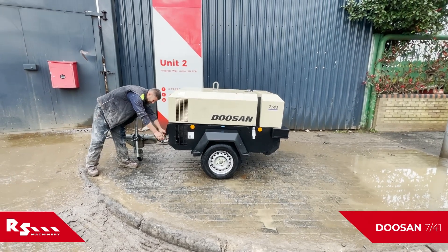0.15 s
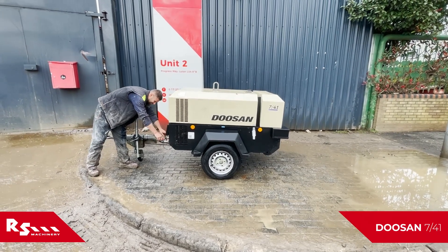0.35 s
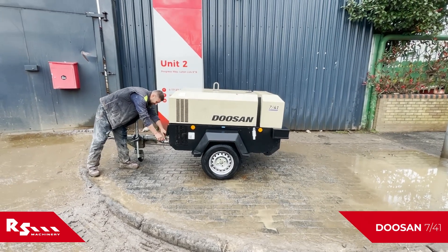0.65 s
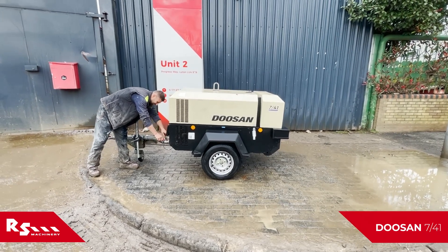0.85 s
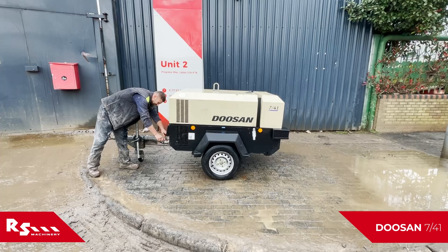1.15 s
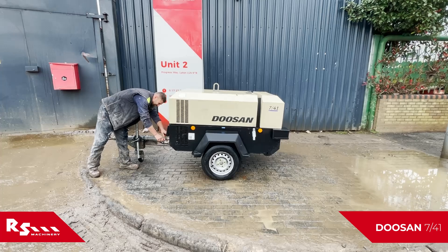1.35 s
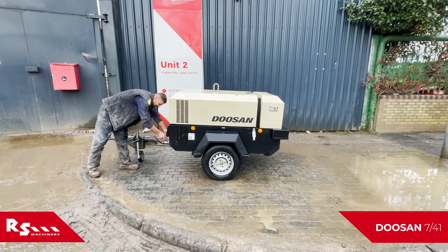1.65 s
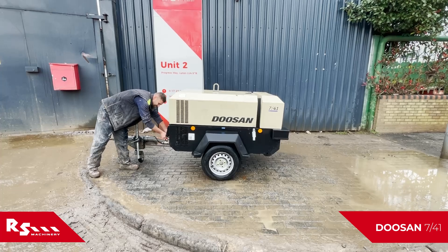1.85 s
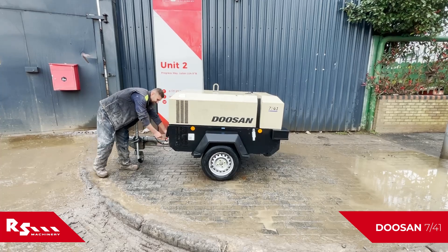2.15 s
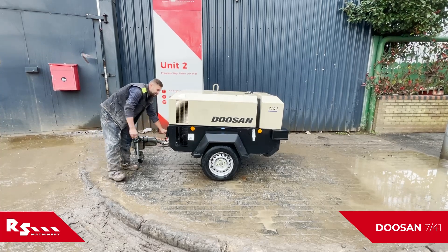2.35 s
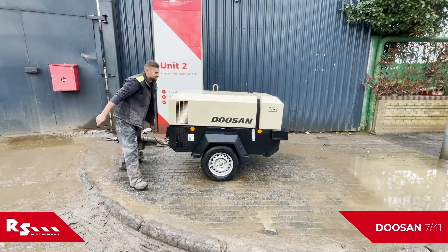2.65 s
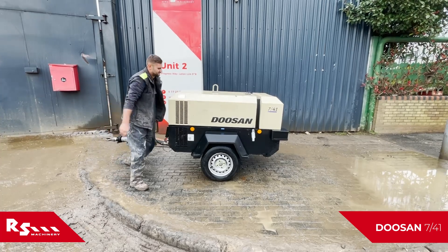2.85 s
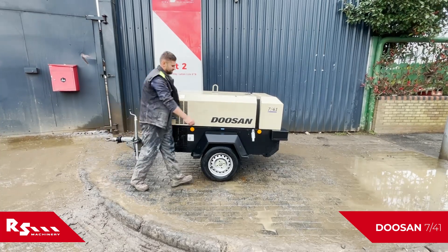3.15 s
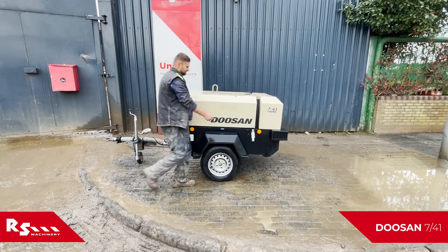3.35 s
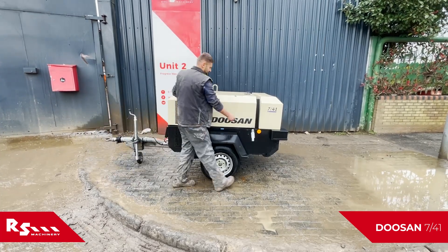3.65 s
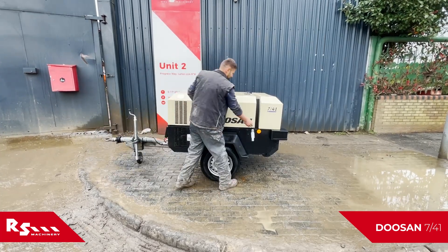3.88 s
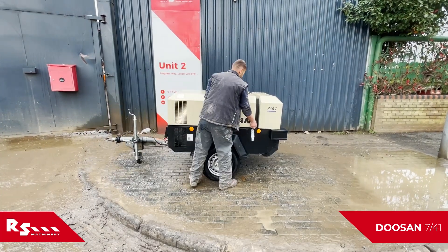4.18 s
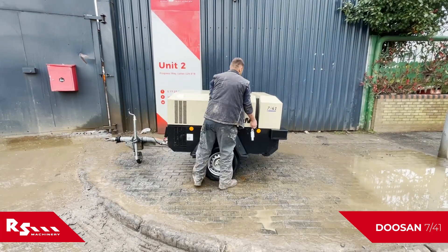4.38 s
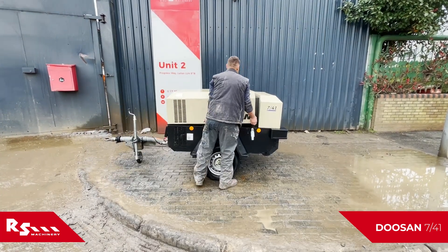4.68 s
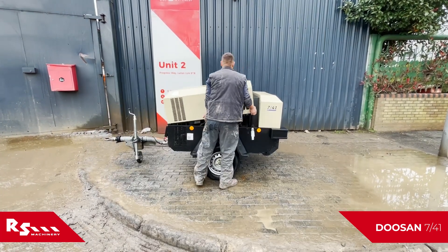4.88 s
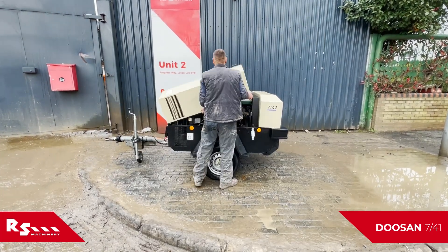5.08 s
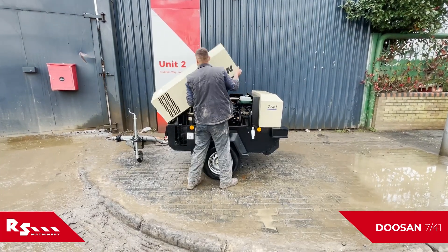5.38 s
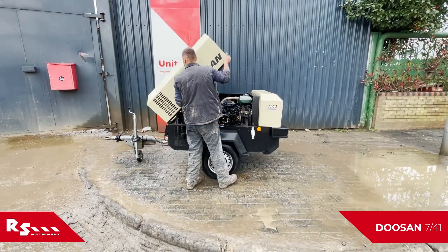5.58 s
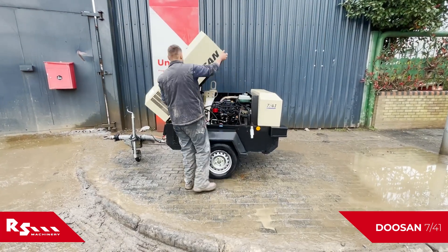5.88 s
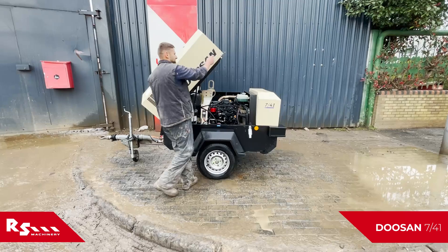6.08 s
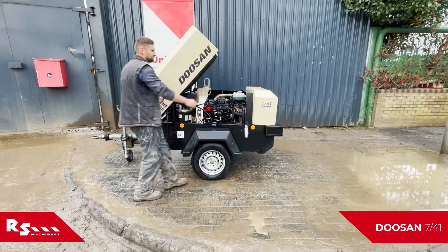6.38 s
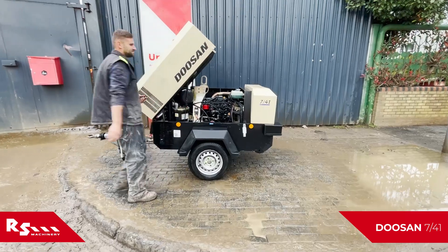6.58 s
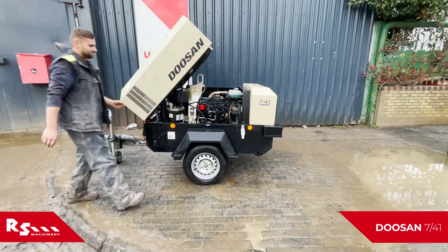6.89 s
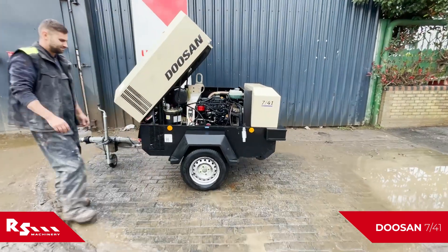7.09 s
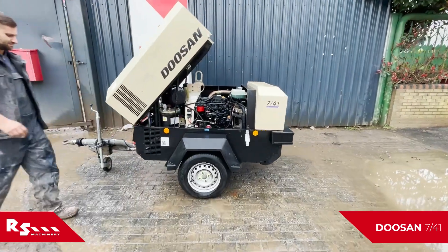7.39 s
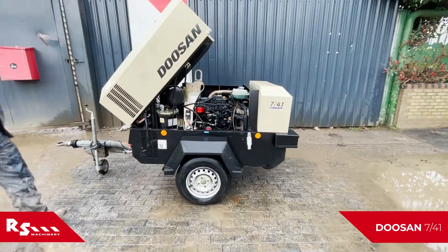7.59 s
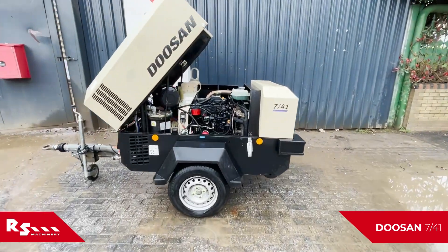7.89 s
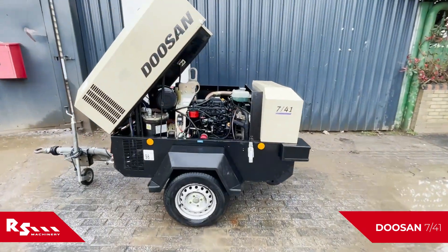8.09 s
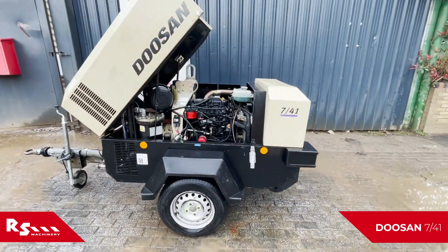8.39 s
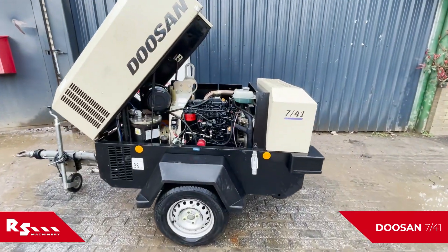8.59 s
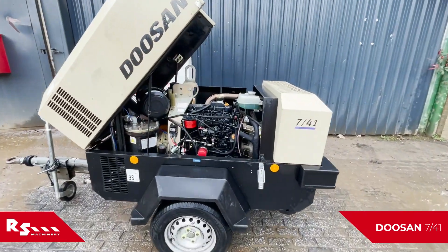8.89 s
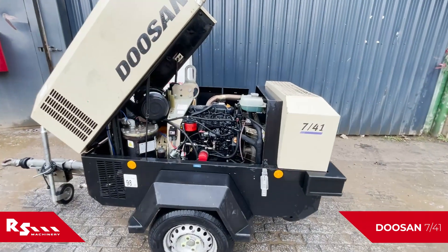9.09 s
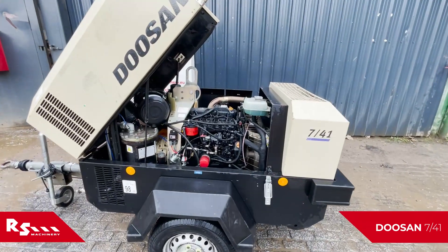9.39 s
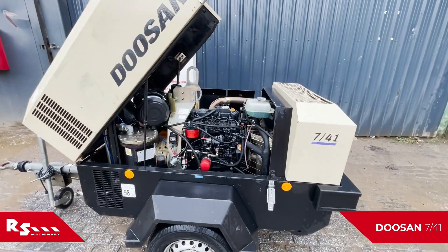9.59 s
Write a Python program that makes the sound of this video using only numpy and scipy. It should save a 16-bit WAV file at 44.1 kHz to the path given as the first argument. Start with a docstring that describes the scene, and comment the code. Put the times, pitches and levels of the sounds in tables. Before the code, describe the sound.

Outdoors in a yard, a small diesel compressor runs fast about five metres away, nearly masked by a bright, rushing air jet. The jet tightens to a fizz and cuts off; the engine coasts down with a brief boom and settles into steady idle. A cover opens, and the muffled chug becomes sharp, clattering knock. The stereo microphone then walks in to about two metres, making it louder and fuller.

```python
"""In a yard, a towable diesel compressor runs fast, about 5 m away, while air hisses from its open tap.
The tap is shut and the engine sinks to idle; the lifted bonnet bares its knock, and two microphone ports
walk up to about 2 m. Harmonics of one crankshaft make exhaust, frame shake and gear whine; noise pulsed by
the firings and struck resonances make the knock. Filtered noise makes the air jet and a few metal ticks."""
import sys
import numpy as np
from scipy import signal
from scipy.fft import rfft, irfft, next_fast_len
from scipy.io import wavfile
from scipy.ndimage import uniform_filter1d

SR = 44100
rng = np.random.default_rng(int(sys.argv[2]) if len(sys.argv) > 2 else 0)


def waveform_to_disk(signal):
    """Save audio, clipped to [-1, 1], as 16-bit WAV at the path in sys.argv[1]."""
    frames = np.transpose(np.atleast_2d(signal))
    scaled = np.clip(frames, -1, 1) * 32767
    samples = np.round(scaled).astype(np.int16)
    wavfile.write(sys.argv[1], SR, samples)


N = 429534
TIME, HZ = np.arange(N) / SR, np.fft.rfftfreq(N, 1 / SR)

# Engine speed. Each row: time in seconds, firings per second.
ENGINE_SPEED = [(0.0, 85.1), (0.35, 93.1), (2.12, 92.45), (2.39, 71.1), (2.6, 56.55), (2.69, 48.3),
                (4.2, 48.92), (4.8, 48.51), (6.0, 48.93), (9.74, 48.79)]
# Bonnet. Each row: time in seconds, opening 0-1.
BONNET_OPENING = [(4.5, 0), (4.9, 0.07), (5.3, 0.54), (5.7, 0.8), (6.6, 0.87)]
# Walk to the engine. Each row: time in seconds, distance from microphones to engine in metres.
MICROPHONE_DISTANCE = [(5.8, 5), (7.1, 4.05), (8.5, 2.83), (9.74, 2.144)]
# Strength of the knock, in firing order. Each entry: level in dB.
CYLINDER_FORCE = [0.15, -0.94, -1.7, -0.59]
# Exhaust silencer's response. Each row: frequency in Hz, level in dB.
SILENCER_RESPONSE = [(40, 7), (49, -5), (70, -3), (97, 8.5), (120, -21), (190, -14)]
# Frame shake at speed. Each row: multiple of the four-stroke cycle rate, relative level in dB.
FAST_LINES = [(5, -12), (7, -3), (9, -18), (12, -3.5), (15, -16), (16, -13.5), (20, -12.5), (28, -5.5)]
# Frame shake at idle. Each row: multiple of the four-stroke cycle rate, relative level in dB.
IDLE_LINES = [(13, -4.5), (16, -11), (18, -9), (20, -6.5), (24, -6.5), (28, -8), (40, -18.5), (44, -19),
              (48, -14), (52, -12), (62, -9), (79, -17), (83, -10)]
# Spectrum of the engine block. Each row: frequency in Hz, level in dB.
BLOCK_SPECTRUM = [(50, 12), (130, -7.5), (240, -2.5), (470, -10.5), (630, -6), (900, -1), (1150, -9),
                  (1450, -5), (2800, -9), (5000, -26), (7300, -41), (11000, -34), (13500, -45),
                  (15800, -47)]
# Resonances of the engine's castings. Each row: frequency in Hz, width in Hz, lift in dB.
CASTING_RESONANCES = [(480, 200, -4.5), (359, 84, 2), (624.5, 43, 8.5), (3120, 560, 7), (6050, 1200, 7.5),
                      (10000, 6700, 3.5)]
# Loose panels, struck every cycle. Each row: place in the cycle 0-1, frequency in Hz, width in Hz,
# relative level in dB, extra level from close by in dB.
LOOSE_PANELS = [(.42, 855, 23.6, 3, -2), (.74, 868, 28, -4.5, -8), (.18, 634, 23, -8.5, 7),
                (0.3, 640, 37, -8.5, 2), (.69, 606, 16, -13.5, 13.5), (.69, 1013, 52, -7.5, -2),
                (.44, 975, 120, -11.5, -1)]
# Hollow resonances of the open bay. Each row: frequency in Hz, width in Hz, lift in dB.
BAY_RESONANCES = [(213, 55, 10), (2830, 26, 10)]
# Notes the knocks ring with. Each row: place in the cycle 0-1, frequency in Hz, relative level in dB.
KNOCK_NOTES = [(.155, 2490, -2.5), (.18, 1900, -5), (.205, 1425, 2), (.425, 3310, -5), (.435, 2160, -1),
               (.47, 1580, -7), (.665, 3110, -5.5), (.675, 2290, -6), (.665, 1760, 1.5), (.68, 1420, 6),
               (.91, 3350, -2.5), (.915, 2550, -0.5), (0.924, 2000, -6), (.95, 1470, 1.5)]
# Gear whine ahead of the cover. Each row: time in seconds, tooth mesh level in dB, its octave's level in dB.
GEAR_WHINE = [(1.8, -72, -57), (2.2, -67, -56.5), (2.65, -61, -54), (2.85, -65, -57.5), (3.1, -58, -50.5),
              (3.27, -79, -61), (3.6, -64, -57), (4.1, -58.5, -60.5), (5.5, -67, -50), (6.5, -67, -43),
              (8.0, -47, -39.5), (9.74, -55, -42)]
# Resonances of the timing cover. Each row: frequency in Hz, width in Hz, lift in dB.
COVER_RESONANCES = [(620, 36, 32), (1070, 60, 19), (1301, 45, 16), (1610, 120, 10), (1790, 110, 7),
                    (2280, 80, 13), (2490, 110, 10)]
# Spectrum of the air jet. Each row: frequency in Hz, level in dB.
JET_SPECTRUM = [(550, -16), (720, -19), (950, -12.5), (1230, -12.5), (1750, -9), (2000, -5), (2450, -5),
                (2900, -3), (3150, -6), (3650, -4), (4200, -7.5), (4900, -6), (5450, -15), (6100, -13.5),
                (7300, -19.5), (10700, -2.5), (13300, -14), (15500, -21)]
# Resonances of the air tap. Each row: frequency in Hz, width in Hz, lift in dB.
TAP_RESONANCES = [(643, 21, 9), (824, 82, 12.5), (2485, 110, 9.5), (3551, 100, 8.5), (3730, 126, 10),
                  (3934, 135, 6.5), (4350, 48.3, 9), (5170, 110, 6), (8130, 368, 6)]
# Stray ticks of metal. Each row: time in seconds, level ahead of the band-pass in dB.
METAL_TICKS = [(3.17, -56), (7.578, -47), (9.15, -33.5)]
# Balance of the microphone ports. Each row: frequency in Hz, left minus right in dB.
PORT_BALANCE = [(60, -17.5), (110, -26.5), (200, -19), (380, -4.5), (700, -1), (1290, 2.5), (2380, -1),
                (4400, 2), (8120, 3), (15000, -1.5)]
# Engine at the ports. Each row: frequency in Hz, phase by which left leads in radians.
ENGINE_LEAD = [(0, -2), (600, 2), (1000, 1.38), (1250, 4.5), (1550, 1), (1950, 2), (2250, 1.47), (4400, 5),
               (5500, 4), (8400, 6), (9350, 2.5), (12500, 1)]
# Air at the ports. Each row: frequency in Hz, phase by which left leads in radians.
AIR_LEAD = [(0, -6), (550, 2.5), (950, 2), (1830, 2.5), (2300, 3.5), (3500, 4.5), (4200, 5.5), (8400, 4.5),
            (9300, 3.5), (12500, 0.5)]
# Gears at the ports. Each row: frequency in Hz, phase by which left leads in radians.
GEAR_LEAD = [(0, 11.5), (700, 1.9), (1400, 2.5), (2600, 2.5)]

# the silencer booms when the firing rate is near its resonance, and while the engine pulls up to speed
BOOM_HZ, BOOM_HALF_WIDTH_HZ, BOOM_LIFT_DB = 74, 15.5, 15
PULL_DB, PULL_S = 6, 0.4
# the engine rocks on its mounts as it lands at idle
LANDING_S = 2.57
ROCK_HZ, ROCK_DB, ROCK_DECAY_S = 12.9, 4, 0.18
# a fuel surge as the falling speed is caught
SURGE_S, SURGE_LENGTH_S = 2.85, 0.15
# the inner panels come into earshot between these distances
INNER_FAR_M, INNER_NEAR_M = 3.23, 3.2
# the jet weakens as the pressure sags, thins to a fizz while the tap closes, then dies away
HISS_DB, FIZZ_DB, SAG_DB_PER_S = -25, -39.5, -2
CLOSING_S, CLOSING_LENGTH_S, CLOSING_HISS_DB, CLOSING_FIZZ_DB = 1.567, 0.052, -5, 9
SHUT_S, RELEASE_DB_PER_S = 1.698, -235
# share of the jet that sounds the tap's resonances, at its height, when that is, and the loss to either side
SINGING, SINGING_S, SINGING_LOSS_PER_S = 1, 0.48, 0.56
# a faint hiss lingers after the tap is shut, then stops
LINGER_HISS_DB, LINGER_FIZZ_DB, LINGER_END_S = -67.5, -73.5, 4.5
EDGE_HZ = 15850  # upper limit of the microphone signal


def exhaust(cycles, firing_hz):
    """The silencer passes the lowest harmonics of the firing rate and booms near its resonance."""
    first, second = (amp(read(SILENCER_RESPONSE, k * firing_hz)) for k in (1, 2))
    # the chug is deeper with the bonnet shut and from close by
    second = second * amp(14.0 * direct_share() - 9.0 - 4.6 * closeness())
    wave = (first * puffs(cycles, 1) + second * puffs(cycles, 2)) / np.hypot(first, second)
    # the shut bonnet passes the third harmonic on early
    shortcut = 0.024 * (1 - np.clip(curve(BONNET_OPENING)[0] / .5, 0, 1))
    fast, _ = running(firing_hz)
    wave = wave + (1 - fast) * amp(-14.5 + 3.8 * closeness()) * puffs(cycles + shortcut, 3)
    rumble = amp(-31.5) * evened(band(rng.standard_normal(N), 57, 160, order=6))
    since = np.maximum(TIME - LANDING_S, 0)
    rock_db = ROCK_DB * np.sin(2 * np.pi * ROCK_HZ * since) * np.exp(-since / ROCK_DECAY_S)
    sway_db = rock_db + 1.0 * surge() + 0.26 * drift(30)
    pair = ports(wave * amp(sway_db) + rumble, ENGINE_LEAD)
    detuning = ((firing_hz - BOOM_HZ) / BOOM_HALF_WIDTH_HZ) ** 2
    boom_db = BOOM_LIFT_DB / (1 + detuning ** 2) + PULL_DB * np.exp(-TIME / PULL_S)
    level_db = boom_db + heard_db(shut_db=-44.0, open_db=8.5, lag=0.31, near_db=7.5)
    return pair / pair.mean(0).std() * amp(level_db)


def puffs(cycles, k, late=0.578, spread=0.17):
    """Harmonic k of the exhaust puffs; the higher it is, the later in its own phase it leaves the silencer."""
    return np.cos(2 * np.pi * k * (len(CYLINDER_FORCE) * cycles - late - spread * k))


def chassis(cycles, firing_hz):
    """Engine orders shake frame and panels, over a rattle that repeats from cycle to cycle and loose noise."""
    fast, coasting = running(firing_hz)
    lines = fast * cyclic(cycles, FAST_LINES) + (1 - fast) * wandering(cycles, IDLE_LINES, sway=0.33)
    lines = colour(lines, amp(lifted(CASTING_RESONANCES)))
    lines = lines * amp(1.5 * drift(15) - 10.0 * coasting)  # with the fuel cut back the orders fade into noise
    block = amp(read(BLOCK_SPECTRUM) + lifted(CASTING_RESONANCES))
    equal_lines = [(k, 0) for k in range(5, 110)]
    repeating = evened(colour(wandering(cycles, equal_lines, sway=0.36), block))
    loose = evened(band(colour(rng.standard_normal((2, N)), block), 68, 1620))
    # the noise swells with each firing
    loose = loose * (1 + 0.58 * np.cos(2 * np.pi * len(CYLINDER_FORCE) * cycles))
    shake = lines + amp(-3) * repeating + (1 - 0.55 * fast) * (1 - coasting) * panels(cycles)
    pair = ports(shake, ENGINE_LEAD) + amp(-1.5) * ports(loose[0], ENGINE_LEAD, loose[1], alike=0.91)
    pair = in_bay(pair)
    drone_db = heard_db(shut_db=-53.5, open_db=5, lag=0.54, near_db=11.5)
    drone_db = drone_db + 4 * fast + 0.83 * coasting + 0.88 * surge()
    rattle_db = heard_db(shut_db=-57.5, open_db=11.5, lag=2.0, near_db=12.5)
    rattle_db = rattle_db + 2.9 * fast - 4 * coasting + 4 * surge()
    return at_level(band(pair, 40, 450), drone_db) + at_level(band(pair, 406, 1200), rattle_db)


def panels(cycles):
    """Loose sheet metal takes blows at fixed places in each cycle and rings; nearness shifts each panel's level."""
    close = closeness()
    return sum(amp(db + close_db * close) * struck(cycles, place, hz, width, rise_s=0.0037, uneven_db=1.1)
               for place, hz, width, db, close_db in LOOSE_PANELS)


def clatter(cycles, firing_hz):
    """Combustion knocks the block over a spray of tiny impacts, and the injectors tick."""
    grit = colour(impacts(cycles), amp(read(BLOCK_SPECTRUM) + lifted(CASTING_RESONANCES)))
    spray, tick = steadied(band(grit, 1010, 3580)), steadied(band(grit, 4420, 18000))
    spray = spray * firing_envelope(cycles, firing_hz, late=0.61, rise_s=.0014, decay_s=0.008,
                                    wash_db=-16.0, uneven_db=0.4)
    tick = tick * firing_envelope(cycles, firing_hz, late=0.566, rise_s=0.00071, decay_s=0.0051,
                                  wash_db=-14.5, uneven_db=2.0)
    chords = band(knocks(cycles), 1250, 3700)[None]
    blows = direct_share(shut=.33) * housing(chords, echo_db=-8, decay_s=0.012)[0]
    alike = .8  # share of the noise common to both ports
    knock = at_level(ports(spray[0], ENGINE_LEAD, spray[1], alike)) + amp(8) * ports(blows, ENGINE_LEAD)
    fast, _ = running(firing_hz)
    knock_db = heard_db(shut_db=-59.0, open_db=11.5, lag=0.53, near_db=12.0) + 2 * fast + 1.0 * surge()
    tick_db = heard_db(shut_db=-69.5, open_db=13.0, lag=1.6, near_db=12)
    tick_pair = ports(tick[0], ENGINE_LEAD, tick[1], alike)
    return at_level(in_bay(knock), knock_db) + at_level(tick_pair, tick_db)


def firing_envelope(cycles, firing_hz, late, rise_s, decay_s, wash_db, uneven_db):
    """Each cylinder fires with its own force; under the shut bonnet the blows sink into a steady wash."""
    firings = len(CYLINDER_FORCE) * cycles - late + 1
    which, age = np.floor(firings).astype(int), (firings % 1) / firing_hz
    uneven = uneven_db * rng.standard_normal(2048)[which]
    force = amp(np.take(CYLINDER_FORCE, which, mode="wrap") + uneven)
    blow = force * (1 - np.exp(-age / rise_s)) * np.exp(-age / decay_s)
    return np.hypot(direct_share() * blow, amp(wash_db))


def knocks(cycles):
    """Each cylinder strikes its own short chord on the block, a hair early or late."""
    ignition = cycles + 0.0005 * drift(50)
    return evened(sum(amp(db) * struck(ignition, place, hz, width_hz=210, rise_s=0.0004, uneven_db=1.0)
                      for place, hz, db in KNOCK_NOTES))


def impacts(cycles, repeat=0.34, size=3600):
    """Tiny impacts, a share of whose power comes back alike in every engine cycle."""
    share = np.clip(repeat, 0, 1)
    pattern = rng.standard_normal((2, size))[:, (cycles * size).astype(int) % size]
    fresh = rng.standard_normal((2, N)) * amp(0.39 * drift(900))
    return np.sqrt(share) * pattern + np.sqrt(1 - share) * fresh


def gear(cycles, firing_hz, order=57):
    """Timing teeth whine, rougher at speed and coasting; tones flare gliding through the cover's resonances."""
    chatter = np.maximum(*running(firing_hz))
    mesh_db, octave_db = curve(GEAR_WHINE)
    turn = 2 * np.pi * order * cycles + (0.13 + 0.2 * chatter) * drift(160)
    mesh = amp(mesh_db + (1.5 + 1.8 * chatter) * drift(30)) * np.cos(turn)
    octave = amp(octave_db + (1.2 + 1.2 * chatter) * drift(30)) * np.cos(2 * turn)
    pinion = amp(octave_db - 18) * np.cos(2 * np.pi * (order // 2) * cycles)
    whine = np.sqrt(2) * (mesh + octave + pinion)
    return ports(colour(whine, amp(lifted(COVER_RESONANCES))), GEAR_LEAD)


def air_tap():
    """A turbulent jet sounds the tap's resonances, turns fizzier as it is shut off, and leaves a faint hiss."""
    from_peak_s = abs(np.minimum(TIME, SHUT_S) - SINGING_S)
    singing = np.clip(SINGING - SINGING_LOSS_PER_S * from_peak_s, 0, 1)
    turbulence = rng.standard_normal((2, N)) * amp(0.4 * drift(45) + 0.7 * drift(400))
    jet = colour(housing(turbulence, echo_db=-4.5, decay_s=0.0059), amp(read(JET_SPECTRUM)))
    jet = (1 - singing) * jet + singing * colour(jet, amp(lifted(TAP_RESONANCES)))
    pair = ports(jet[0], AIR_LEAD, jet[1], alike=0.85)
    closing = np.clip((TIME - CLOSING_S) / CLOSING_LENGTH_S, 0, 1)
    flow_db = SAG_DB_PER_S * TIME + RELEASE_DB_PER_S * np.maximum(TIME - SHUT_S, 0)
    lingering = np.clip((LINGER_END_S - TIME) / 0.027, 0, 1)
    hiss = amp(HISS_DB + flow_db + CLOSING_HISS_DB * closing) + lingering * amp(LINGER_HISS_DB)
    fizz = amp(FIZZ_DB + flow_db + CLOSING_FIZZ_DB * closing) + lingering * amp(LINGER_FIZZ_DB)
    return hiss * at_level(band(pair, 670, 8720)) + fizz * at_level(band(pair, 4100, 18000))


def ticks():
    """Short bright taps of metal on metal: decaying bursts of noise."""
    strike = sum(amp(db) * (TIME >= s) * np.exp(-abs(TIME - s) / 0.0037) for s, db in METAL_TICKS)
    return band(strike * rng.standard_normal((2, N)), 3000, 13000)


def running(firing_hz):
    """How fast the engine runs and how freely it coasts down, both 0-1."""
    slowing = uniform_filter1d(-np.gradient(firing_hz) * SR, size=6615)
    return np.clip((firing_hz - 52) / 22, 0, 1), np.clip(slowing / 78, 0, 1)


def surge():
    """A timed pulse 0-1: the extra fuel that catches the falling speed."""
    return np.exp(-((TIME - SURGE_S) / SURGE_LENGTH_S) ** 4)


def cyclic(cycles, orders, size=4096):
    """A wave that repeats with every engine cycle, made of the given lines."""
    place = np.arange(size + 1) / size
    wave = sum(amp(db) * np.cos(2 * np.pi * (round(k) * place + rng.random())) for k, db in orders)
    return np.sqrt(2) * np.interp(cycles % 1, place, wave)


def wandering(cycles, orders, sway=.5):
    """Engine lines whose strengths shift slowly, each in its own way."""
    angle = sway * drift(1.51)
    return np.cos(angle) * cyclic(cycles, orders) + np.sin(angle) * cyclic(cycles, orders)


def struck(cycles, place, hz, width_hz, rise_s, uneven_db):
    """A resonance struck at one place in every engine cycle, each time with a slightly different force."""
    t = np.arange(SR // 4) / SR
    hits = np.diff(np.floor(cycles - place), prepend=-1).clip(0, 1)
    blows = hits * amp(uneven_db * drift(14))
    ring = np.sin(2 * np.pi * hz * t) * np.exp(-np.pi * width_hz * t) * (1 - np.exp(-t / rise_s)) ** 2
    return evened(signal.oaconvolve(blows, ring)[:N])


def heard_db(shut_db, open_db, lag, near_db):
    """Level of a part: open_db more at full opening (later for a larger lag), near_db per halved distance."""
    opening, metres = np.clip(curve(BONNET_OPENING)[0], 0, 1), curve(MICROPHONE_DISTANCE)[0]
    return shut_db + open_db * opening ** lag + near_db * np.log2(MICROPHONE_DISTANCE[0][1] / metres)


def direct_share(shut=0.1, bare=0.59, gap=0.074):
    """Share of the engine's sound that arrives directly; a small gap under the bonnet is enough to free it."""
    return shut + (bare - shut) * np.clip(curve(BONNET_OPENING)[0] / gap, 0, 1)


def closeness():
    """How near the microphones are to the open bay, 0-1."""
    metres = curve(MICROPHONE_DISTANCE)[0]
    return np.clip((INNER_FAR_M - metres) / (INNER_FAR_M - INNER_NEAR_M), 0, 1)


def in_bay(pair):
    """From close by the open bay adds its own resonances."""
    return pair + closeness() * colour(pair, amp(lifted(BAY_RESONANCES)) - 1)


def housing(x, echo_db, decay_s):
    """Quick reflections inside the steel housing comb the spectrum."""
    t = np.arange(SR // 20) / SR
    echoes = rng.standard_normal(len(t)) * np.exp(-t / decay_s) * (t > .001)
    response = (t == 0) + amp(echo_db) * echoes / np.linalg.norm(echoes)
    return signal.oaconvolve(x, response[None], axes=1)[:, :N]


def ports(direct, phase, scattered=0., alike=0.74):
    """Two microphone ports hear a sound out of step; the left one is weak in the bass."""
    alike, lean = np.clip(alike, 0, 1), amp(read(PORT_BALANCE))
    right = alike * direct + np.sqrt(1 - alike ** 2) * scattered
    norm = np.sqrt(2 / (1 + lean ** 2))
    return np.array([colour(direct, lean * norm), colour(right, norm * np.exp(-1j * read(phase)))])


def amp(db):
    """Decibels to gain."""
    return 10 ** (np.asarray(db) / 20)


def curve(rows, at=TIME):
    """The columns of a table, joined by straight lines."""
    s, *columns = np.transpose(rows)
    return [np.interp(at, s, c) for c in columns]


def read(points, hz=HZ):
    """A spectrum on a log-frequency axis."""
    f, value = np.transpose(points)
    return np.interp(np.log(hz + 1), np.log(f + 1), value)


def lifted(resonances):
    """The dB that a set of resonances adds to a spectrum."""
    return sum(db / (1 + (2 * (HZ - hz) / width) ** 2) for hz, width, db in resonances)


def colour(x, gain):
    """Filters by a gain given on HZ."""
    size = next_fast_len(N + 4096)
    hz = np.fft.rfftfreq(size, 1 / SR)
    return irfft(rfft(x, size) * np.interp(hz, HZ, gain), size)[..., :N]


def band(x, lo_hz, hi_hz, order=12):
    """Band-pass, steeper for a higher order."""
    return colour(x, ((1 + (lo_hz / (HZ + 1)) ** order) * (1 + (HZ / hi_hz) ** order)) ** -.5)


def drift(rate):
    """Random wander of rms 1, with the given number of knots per second."""
    knots = np.arange(0, TIME[-1] + 1, 1 / rate)
    return evened(np.interp(TIME, knots, rng.standard_normal(len(knots))))


def evened(x):
    """Scales to rms 1."""
    return x / np.sqrt(np.mean(x ** 2) + 1e-20)


def steadied(x, size=128):
    """Evens out the force of a noise, so that blows cut from it are alike in strength."""
    return x / np.sqrt(abs(uniform_filter1d(x ** 2, size, axis=-1)) + 1e-20)


def at_level(pair, db=0, size=11025):
    """Holds a stereo sound at a given level, averaged over size samples."""
    power = uniform_filter1d(pair.mean(0) ** 2, size)
    return pair * amp(db) / np.sqrt(abs(power) + 1e-14)


def scene():
    """One crankshaft drives every engine layer; the air tap and stray ticks sound beside it."""
    firing_hz, = curve(ENGINE_SPEED)
    cycles = np.cumsum(firing_hz) / SR / len(CYLINDER_FORCE) + 0.00015 * drift(28)
    return (exhaust(cycles, firing_hz) + chassis(cycles, firing_hz) + clatter(cycles, firing_hz)
            + gear(cycles, firing_hz) + air_tap() + ticks())


def record(dry):
    """A steep low-pass sets the upper limit of the microphone signal."""
    low_pass = signal.firwin(511, EDGE_HZ, window=("kaiser", 9), fs=SR)
    return signal.oaconvolve(dry, low_pass[None], "same")


dry = scene()
out = record(dry)
waveform_to_disk(out)
```